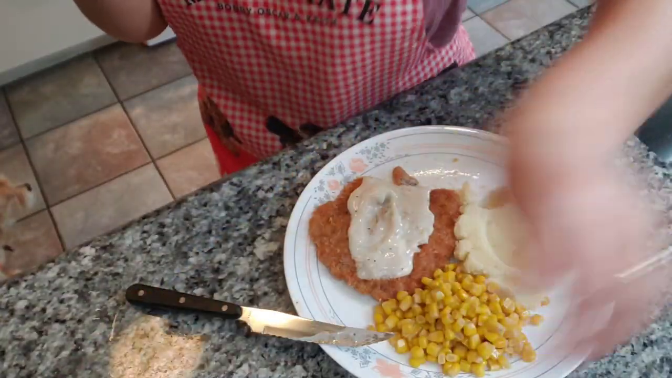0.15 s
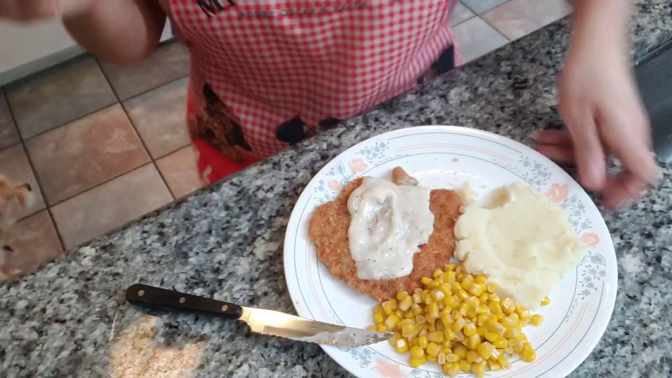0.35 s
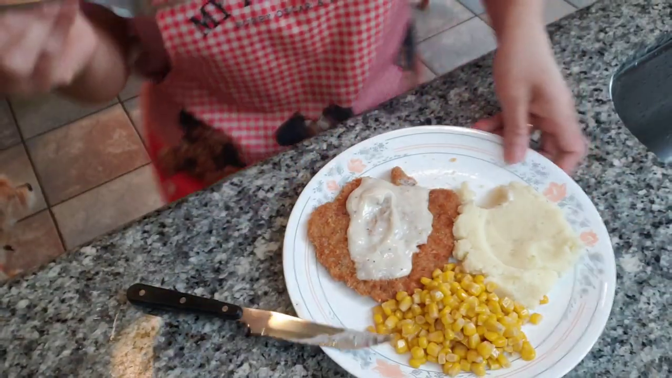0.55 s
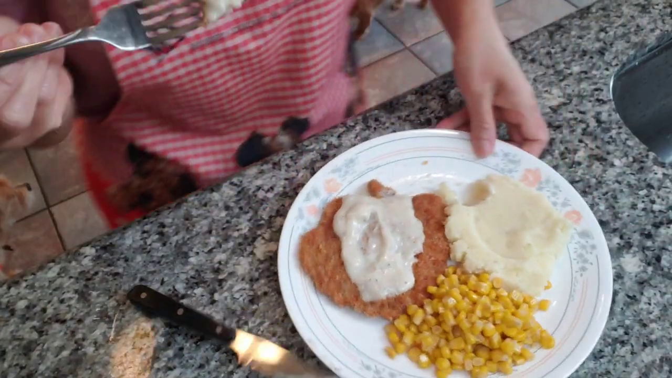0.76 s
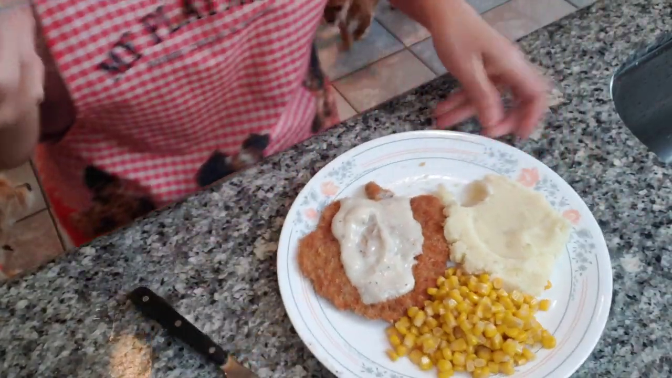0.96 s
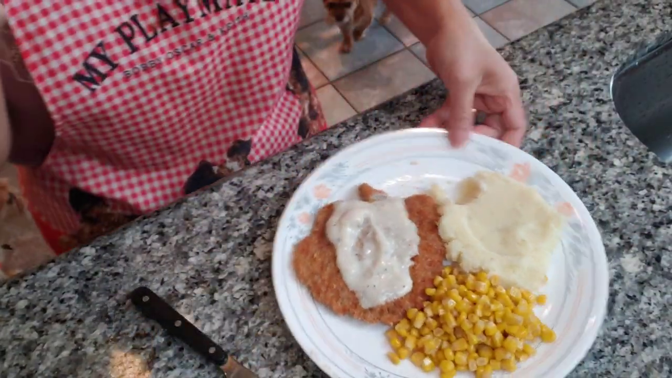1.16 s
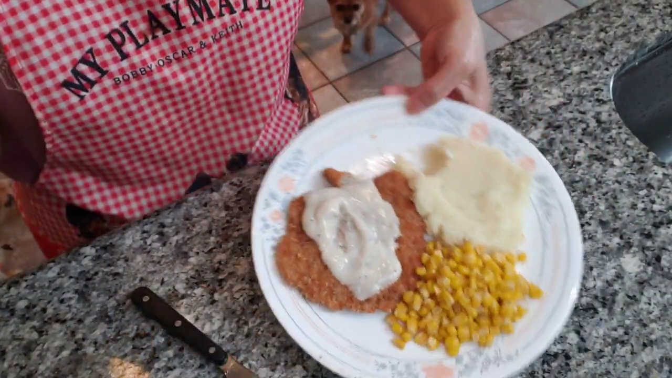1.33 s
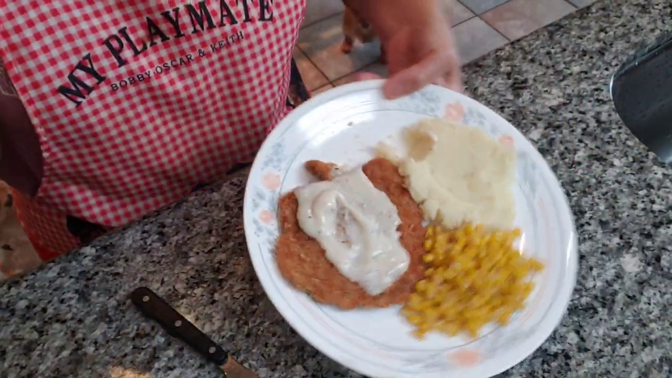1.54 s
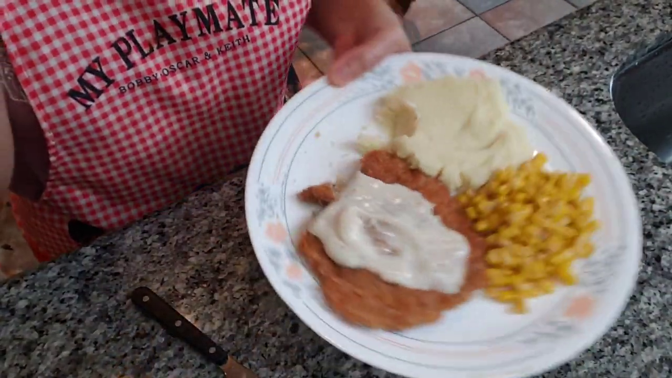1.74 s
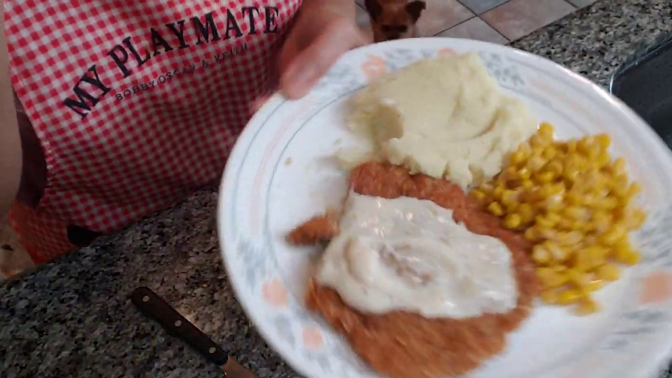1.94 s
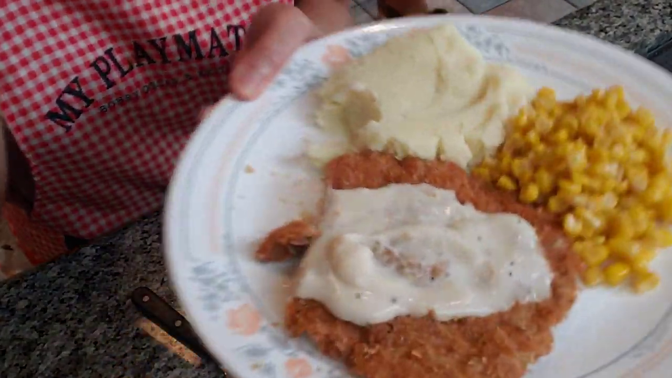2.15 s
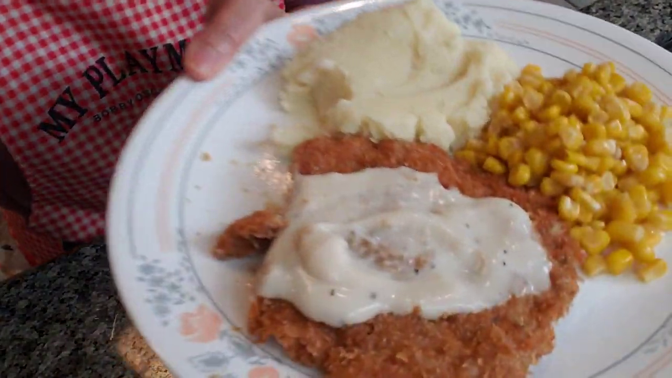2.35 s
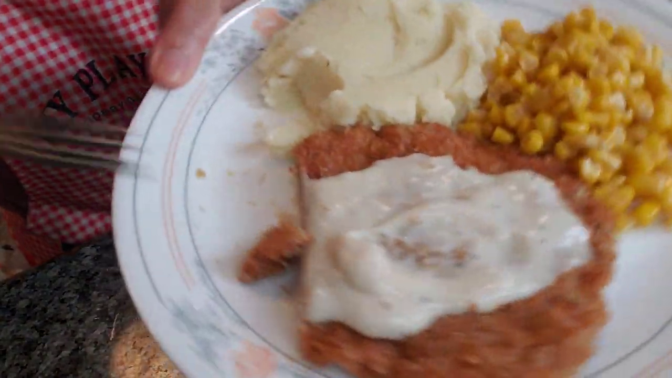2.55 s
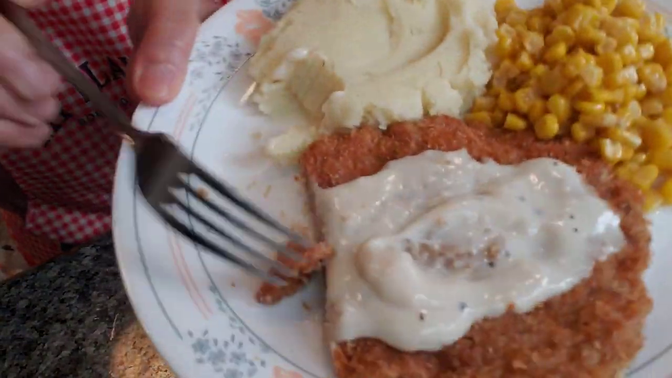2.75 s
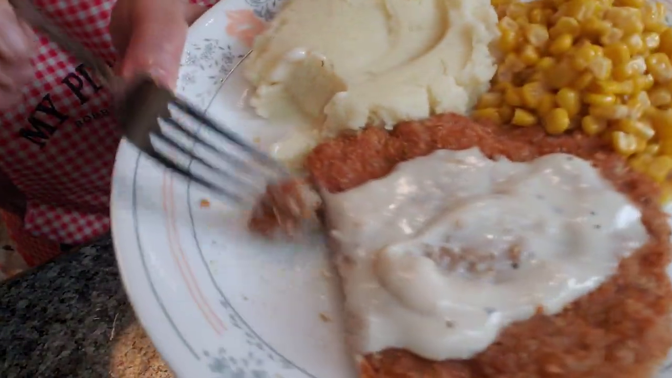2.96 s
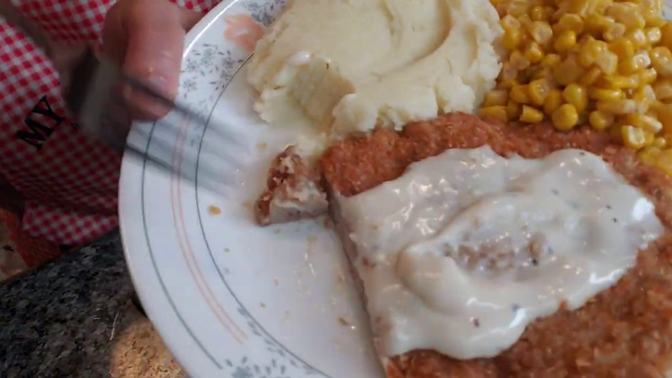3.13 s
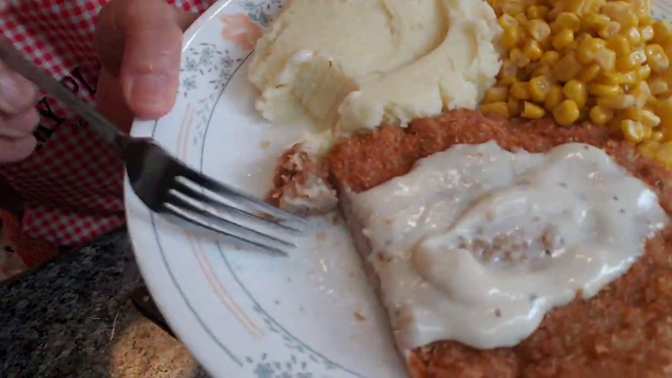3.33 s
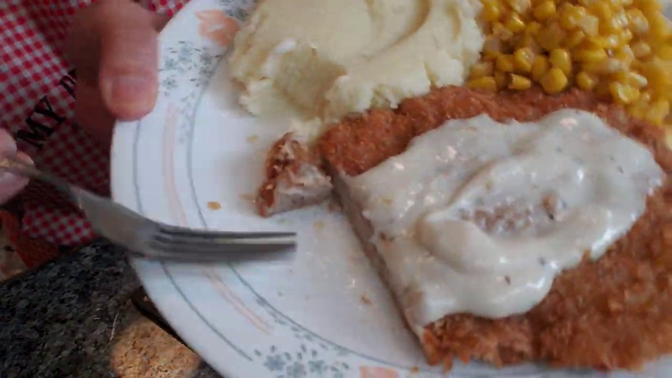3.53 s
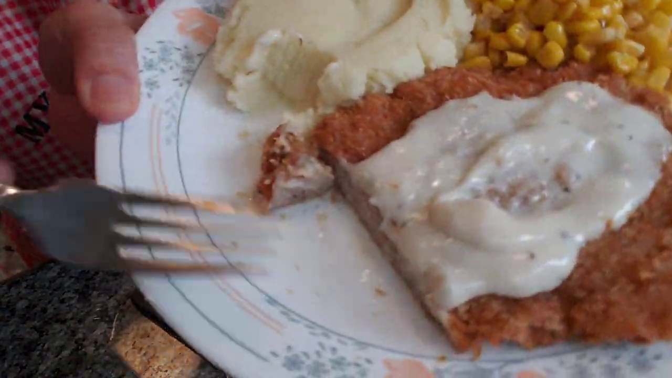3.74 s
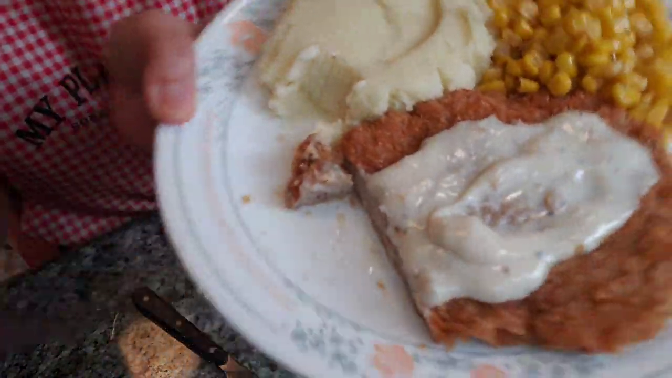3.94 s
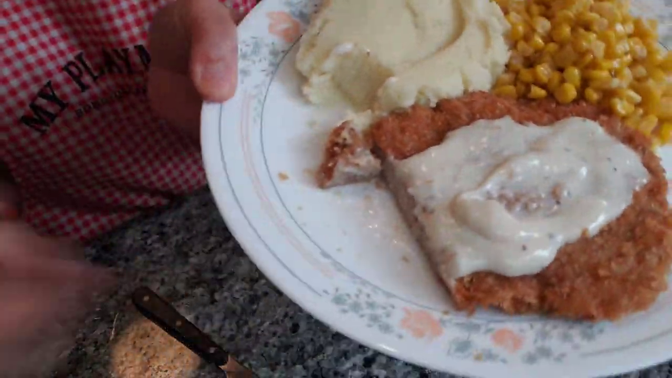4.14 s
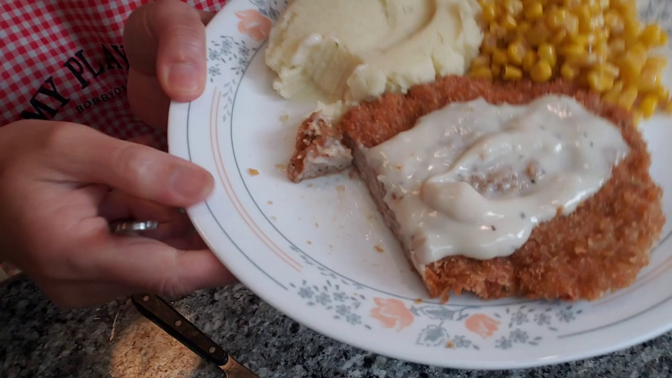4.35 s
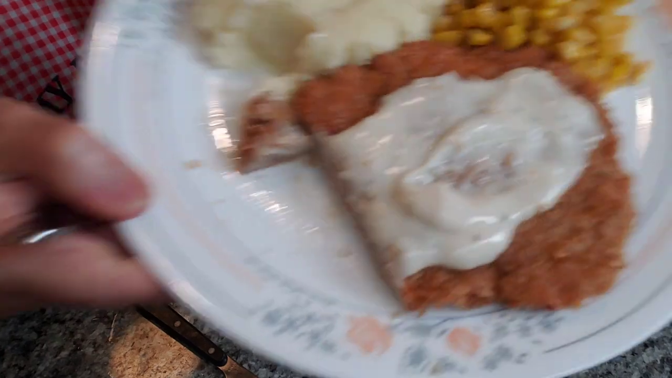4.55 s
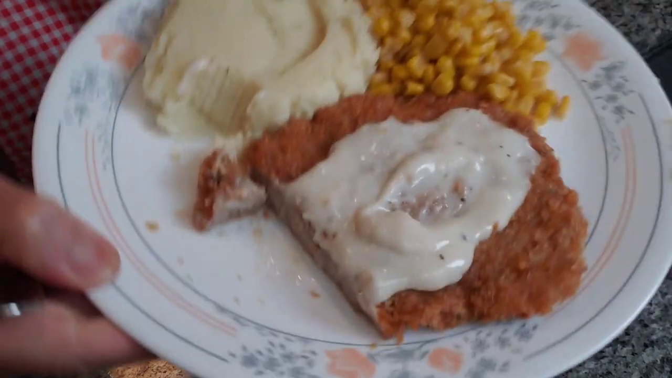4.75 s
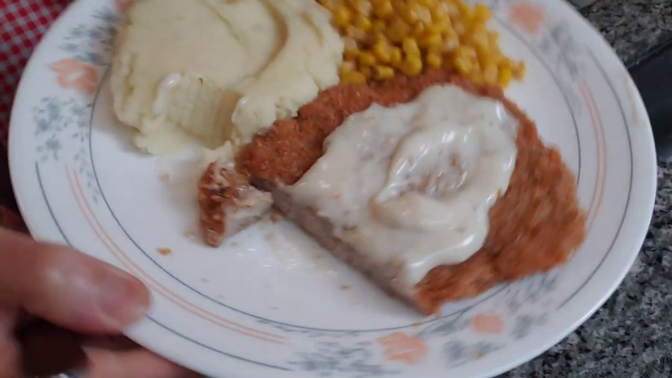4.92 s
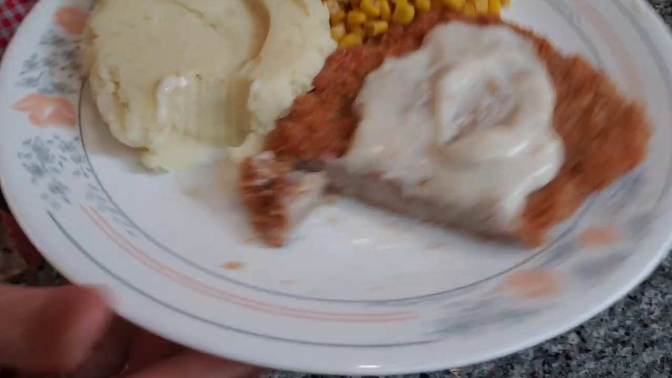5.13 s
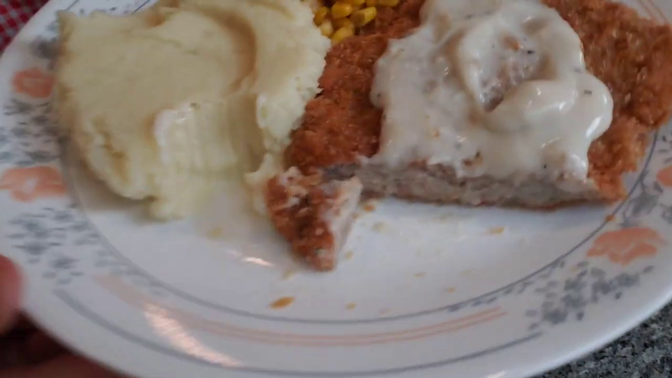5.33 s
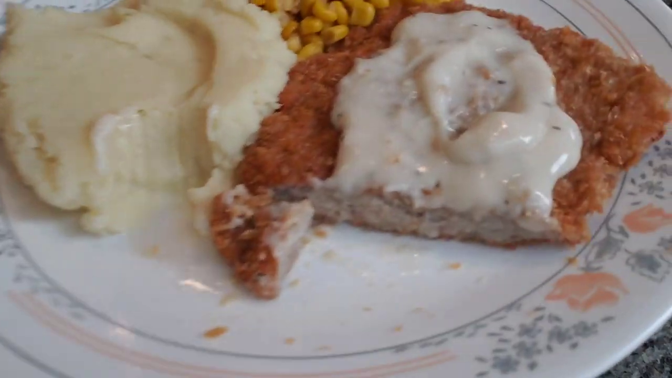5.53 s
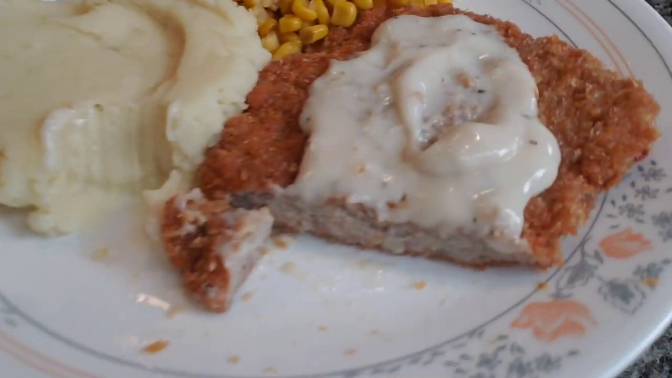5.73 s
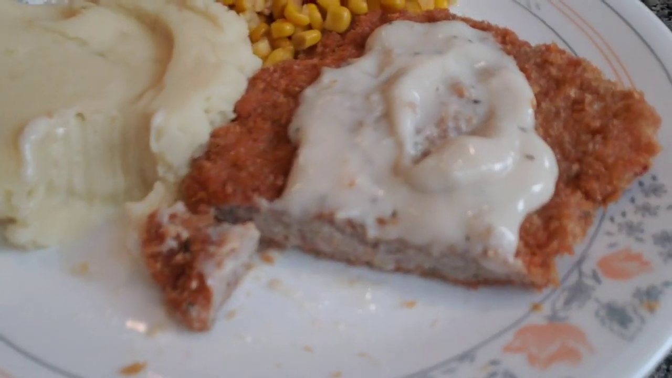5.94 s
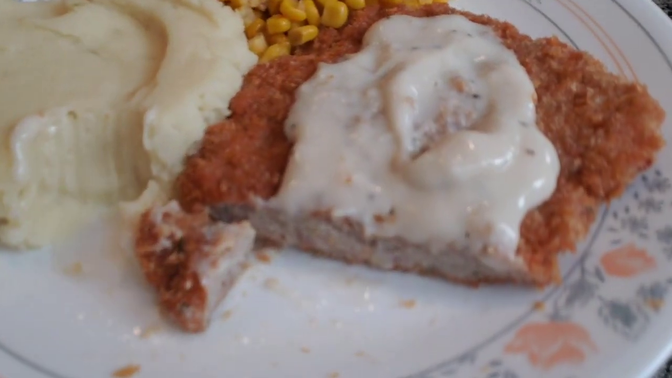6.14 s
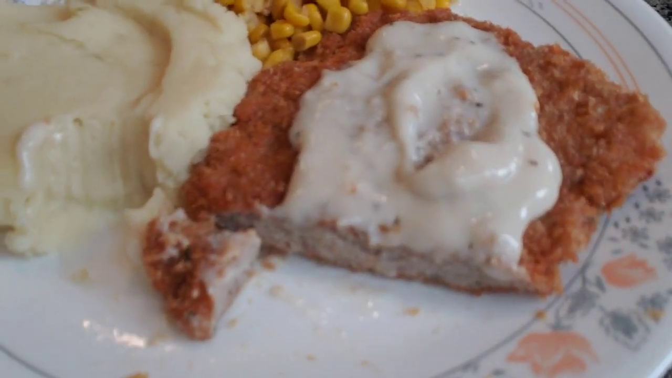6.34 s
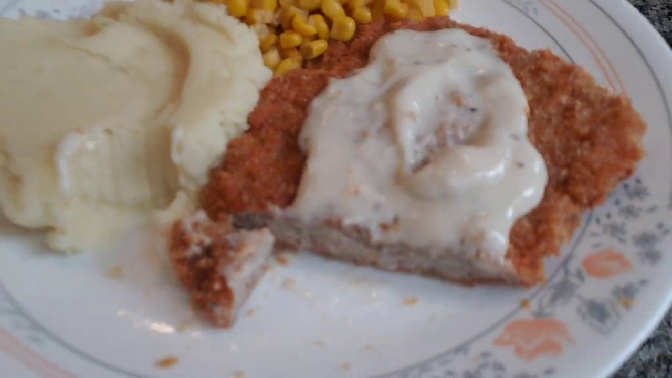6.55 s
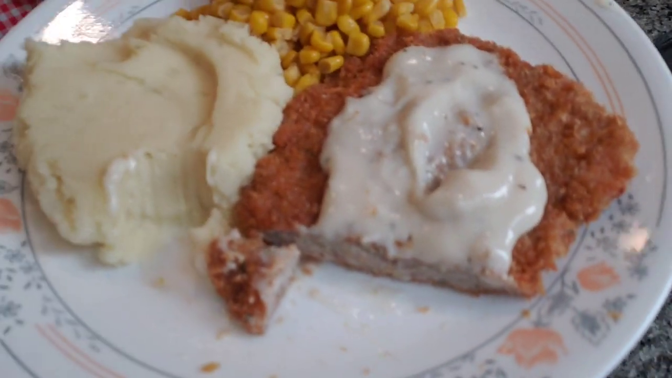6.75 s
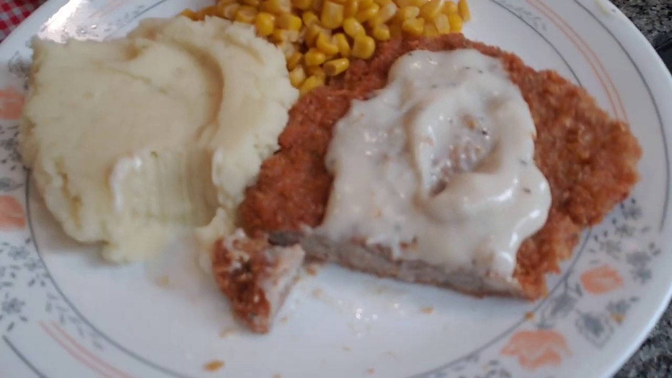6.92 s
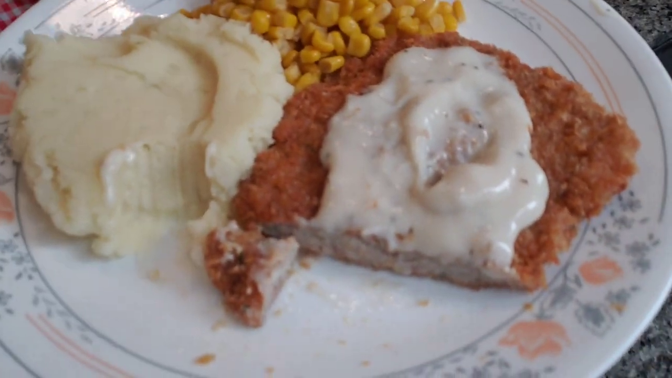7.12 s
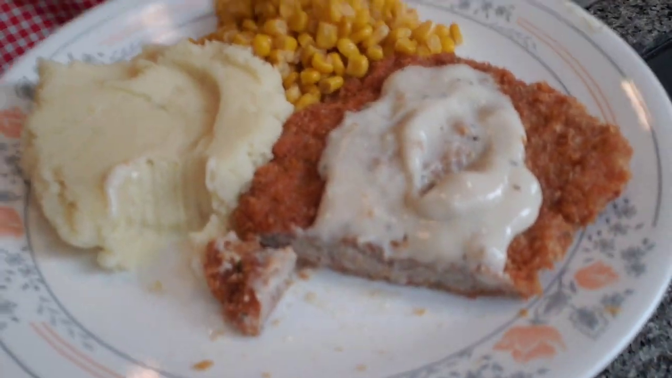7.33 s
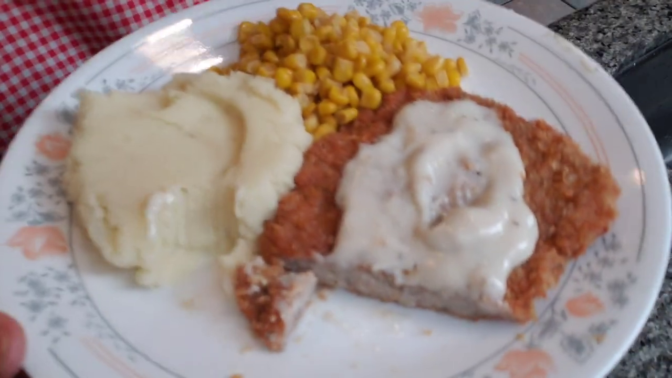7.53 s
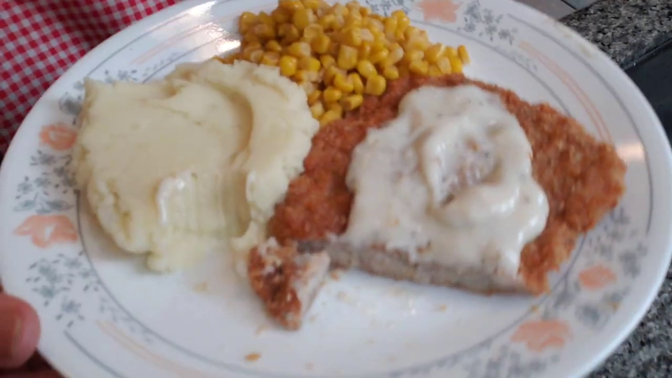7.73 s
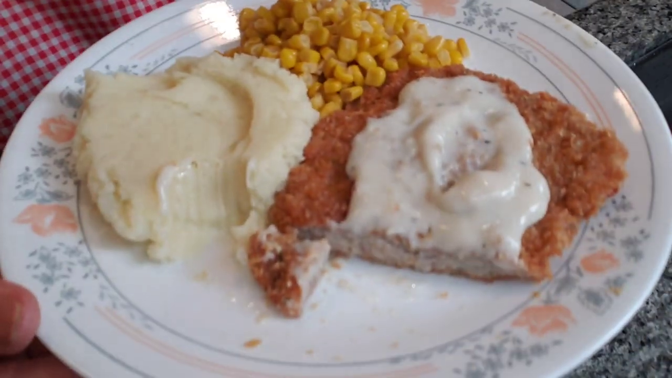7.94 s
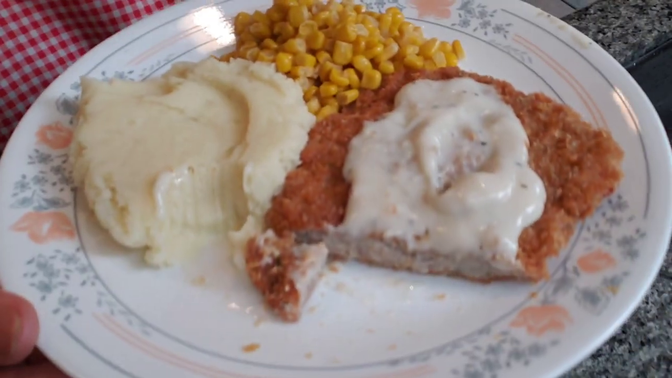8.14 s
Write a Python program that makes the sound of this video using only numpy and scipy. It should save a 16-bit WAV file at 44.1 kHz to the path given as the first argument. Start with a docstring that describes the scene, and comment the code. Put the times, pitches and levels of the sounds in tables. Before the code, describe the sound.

A faint appliance hum and room hiss fill a tiled kitchen, with a dog's claws ticking irregularly, soft paw shuffling and occasional low thuds. At about 1 second a ceramic plate is lifted from a stone counter and a knife slips off it: a quick cluster of dull knocks with one sharp, bright crack, the loudest moment. Softer knocks and scrapes follow from 1.9 to 2.5 seconds. Near 3 seconds a fork rubs the glaze and the plate sings faintly. From 3.5 to 4.1 seconds the fork taps the plate about four times, making close, bright, briefly ringing clinks with a little room echo. The whole background then sinks to near silence by 4.5 seconds, leaving only faint claw ticks. Hum and hiss return by about 7 seconds, with two light clicks at 7.3 and 7.7 seconds and soft thuds until the end, just past 8 seconds.

```python
"""A tiled kitchen: an appliance hums over room hiss; dog claws, stray knocks and low thuds come and go.
Near 1 s a plate is lifted off a stone counter and a knife slips off it: dull knocks with bright cracks.
Near 3 s a fork rubs the glaze and the plate sings; from 3.5 to 4 s it taps, ringing fork and plate.
The whole background then sinks, and is slowly back by about 7 s."""
import sys
import numpy as np
from scipy import signal
from scipy.fft import rfft, irfft
from scipy.io import wavfile

SR = 44100
rng = np.random.default_rng(int(sys.argv[2]) if len(sys.argv) > 2 else 0)


def pcm_store(signal):
    """Save signal as 16-bit PCM."""
    levels = np.round(np.clip(np.atleast_2d(signal), -1, 1) * 32767)
    wavfile.write(sys.argv[1], SR, levels.astype(np.int16).T)


N = 365144

# Hum level, which the background follows. Each row: time in seconds, level in dB.
HUM_LEVELS = [(0.0, -53), (3.43, -53.5), (3.83, -55), (4.47, -68), (5.26, -68), (6.02, -66.5), (6.59, -61),
              (7.24, -53), (8.28, -53.5)]
# Motor tones. Each row: frequency in Hz, relative level in dB, phase wander rate in Hz.
MOTOR_TONES = [(161, 1.5, 3.3), (504, -8.5, 3.8), (572, -10.5, 11), (799, -8, 2.9)]
# Room hiss. Each row: frequency in Hz, relative spectral density in dB.
HISS_SPECTRUM = [(60, -38), (100, -3.5), (162, -7.5), (250, -6.5), (320, -16.5), (450, -7.5), (858, -9),
                 (1350, -11), (2380, -8.5), (4360, -14), (7200, -16.5), (16000, -14)]
# Hiss width. Each row: frequency in Hz, left-right correlation.
HISS_CORRELATION = [(60, 1), (180, 0.36), (550, 0.67), (1650, -0.49), (4970, 0.15), (15000, -0.14)]
# Hiss balance. Each row: frequency in Hz, pan in dB (left over right, as in all tables).
HISS_PAN = [(60, -2), (240, 0), (950, 2.5), (3770, -3.5), (9000, 3), (15000, -4)]
# Thuds of steps and handling. Each row: peak time in seconds, level in dB.
THUD_PEAKS = [(0.41, -51), (0.71, -53), (1.04, -46), (1.73, -53), (1.96, -49), (2.3, -46), (2.55, -46),
              (2.76, -44), (3.34, -49), (3.71, -57), (4.49, -64), (5.09, -60), (5.63, -57), (6.76, -51),
              (7.52, -42.5), (8.04, -45), (8.28, -45)]
# Room decay. Each row: frequency in Hz, T60 in seconds.
ROOM_T60 = [(100, 0.1), (1000, 0.57), (4000, 0.58), (7000, 0.56), (10000, 0.47), (16000, 0.45)]
# Bouts of paw shuffling. Each row: peak time in seconds, level in dB.
SHUFFLE_PEAKS = [(0.05, -45.5), (0.35, -46.5), (1.53, -42.5), (2.02, -46.5), (2.36, -49), (2.53, -43),
                 (3.1, -44), (3.5, -43.5), (4.45, -56.5), (5.8, -55), (7.8, -43.5)]
# Claws on tile. Each row: start in seconds, peak in dB, resonance in Hz.
CLAW_TICKS = [(0.2117, -33.5, 2790), (0.235, -27.5, 1870), (0.3326, -36.5, 2350), (0.4202, -35, 2400),
              (0.529, -33.5, 3820), (0.6946, -30, 2980), (0.944, -32, 2380), (1.2182, -36, 2300),
              (1.3126, -30, 2700), (1.6452, -38.5, 2750), (2.321, -30, 3120), (2.649, -35, 2760),
              (2.809, -32.5, 3200), (3.016, -34.5, 2720), (3.263, -31.5, 2520), (3.3358, -35.5, 1300),
              (3.767, -33, 1510), (4.415, -50, 2200), (4.5, -48.5, 2130), (4.73, -51, 3100),
              (4.91, -48, 1620), (5.0146, -46.5, 2450), (5.3228, -39.5, 2560), (5.546, -47, 2280),
              (5.7348, -41.5, 2370), (5.8153, -41.5, 1430), (6.0686, -43, 1450), (6.123, -42.5, 2480),
              (6.22, -46, 3980), (6.4022, -49, 1800), (6.618, -40, 2190), (6.7024, -39.5, 1740),
              (6.825, -36, 1950), (6.868, -36.5, 3500), (6.9875, -37, 2430), (7.099, -38.5, 2340),
              (7.1652, -36.5, 1270), (7.278, -35, 3750), (7.325, -34, 4630), (7.328, -37, 1480),
              (7.384, -39, 2630), (7.4773, -35.5, 2000), (7.741, -34.5, 5280), (7.773, -31, 2330),
              (7.7958, -33, 1600), (8.059, -30.5, 2040), (8.1893, -34.5, 2600)]
# Assorted knocks, ticks, scrapes and low thuds, including knife and plate on the counter near 1 s.
# Each row: start in seconds, peak in dB, body in Hz, crack over body in dB,
# contact time in seconds, pan in dB.
KNOCKS_AND_TICKS = [(0.21, -31, 2700, -15, 0.0016, 0), (1.021, -11.5, 720, 1.5, 0.011, 2),
                    (1.023, -9, 1120, 12, 0.00087, 14), (1.076, -18, 710, -1, 0.021, 3),
                    (1.093, 4, 5600, 16, 0.00054, -5), (1.096, -24.5, 3800, 5, 0.015, 10),
                    (1.099, -15, 796, 1.5, 0.0026, 13.5), (1.1026, -20, 6040, 0, 0.0017, 19),
                    (1.096, -32, 340, -18, 0.044, -2), (1.084, -33, 121, -30, 0.044, -1),
                    (1.138, -31, 392, -10, 0.008, 1), (1.14, -29, 6000, -7, 0.0026, 7),
                    (1.502, -29.5, 400, -3.5, 0.012, 6), (1.9, -18, 470, -20, 0.031, 3),
                    (1.892, -27, 2530, -8.5, 0.061, 16), (1.897, -18.5, 6500, -13, 0.022, -2),
                    (1.952, -26.5, 493, -13, 0.051, 2), (2.012, -33.5, 503, -17, 0.049, 4),
                    (2.381, -28.5, 197, -24, 0.064, 2), (2.381, -29.5, 900, -14, 0.042, 6),
                    (2.436, -29.5, 1490, -25, 0.046, 6), (2.537, -32.5, 236, -15, 0.058, 6),
                    (3.015, -28.5, 5500, -1, 0.024, 1), (3.462, -31, 5000, -5, 0.02, 7),
                    (3.485, -26.5, 394, -13, 0.018, 5), (4.036, -42.5, 62, -40, 0.017, 19),
                    (4.677, -35, 6000, 7, 0.002, 6), (7.332, -21.5, 4800, 5, 0.008, 2),
                    (7.74, -22, 6150, -5, 0.0033, 2)]
# Tines on glaze. Each row: start in seconds, peak in dB, mode in Hz, contact time in seconds.
FORK_RUBS = [(3.025, -40.5, 1214, 0.069), (3.127, -34.5, 1230, 0.0095), (3.114, -31, 715, 0.037),
             (3.2, -35, 541, 0.042), (3.201, -34, 715, 0.048), (3.254, -38, 740, 0.025)]
# Plate modes. Each row: frequency in Hz, gain in dB, T60 in seconds.
PLATE_MODES = [(351, 0.5, 0.15), (482, 8.5, 0.078), (757, 10.5, 0.053), (1364, 11, 0.08), (2000, 6, 0.084),
               (2700, -6, 0.057)]
# Fork modes. Each row: frequency in Hz, gain in dB, T60 in seconds before hand damping.
FORK_MODES = [(3600, 14, 0.055), (3980, 23.5, 0.06), (4780, 11, 0.12), (5740, 8, 0.1), (6780, -9, .1),
              (6860, 7, 0.15), (7100, 3, 0.089), (7080, 8, .1), (7480, 8, 0.1), (7960, 11, 0.05),
              (8900, 15, .08), (9370, 15, 0.1), (10400, 14, 0.13), (11450, 12.5, 0.12), (12320, 5.5, 0.08),
              (13060, 4, 0.054), (14180, 7, .06), (14590, 9, 0.065), (15400, 9, .06)]
# Fork on plate. Each row: start in seconds, peak in dB, lower and upper favoured pitch in Hz,
# upper trim in dB, shunned pitch in Hz, rise and contact time in seconds,
# plate over fork in dB, pan in dB.
FORK_TAPS = [(3.491, -5, 5000, 15100, 0, 9000, 0.0044, 0.002, -16.5, 6),
             (3.501, -16, 4200, 15000, -11, 8800, 0.0047, 0.011, -15, 4),
             (3.623, -8.5, 6000, 10500, -10.5, 8700, 0.00093, 0.022, -13, 3.5),
             (3.818, -9.5, 5500, 12700, 13, 8900, 0.0034, 0.0059, -29, 3),
             (3.825, -10, 5260, 12100, -2.5, 8150, 0.0044, 0.016, -18.5, 0.5),
             (4.036, -6, 7340, 13100, 16, 4320, 0.0022, 0.017, -21, 3.5),
             (4.051, -7, 7500, 12400, -7.5, 4150, 0.0092, 0.023, -28, -2)]
# Microphone response. Each row: frequency in Hz, left gain in dB, right gain in dB.
MIC_RESPONSE = [(900, -2, -2.5), (7260, 5, -2.5), (8330, -7, -3), (10000, -4, -3), (11760, -1, -2.5),
                (14500, 2, -4)]
# Phase turns on the right side. Each row: centre in Hz, width in Hz.
MIC_PHASE_TURNS = [(1700, 150), (3300, 1000), (5000, 2300), (7700, 310), (9300, 230), (12000, 880),
                   (14500, 360)]

HISS_OVER_HUM_DB, RUMBLE_OVER_HUM_DB, SHUFFLE_OVER_HUM_DB = 13, -6.5, -13
ANTIPHASE = np.array([[1], [-1]])


def amp(db):
    return 10 ** (np.asarray(db) / 20)


def unit_rms(x):
    return x / np.sqrt(np.mean(x ** 2) + 1e-20)


def at_hz(points, hz):
    points_hz, values = np.transpose(points)
    return np.interp(np.log(np.maximum(hz, 1)), np.log(points_hz), values)


def pan(db):
    return amp(ANTIPHASE * db / 2)


def bandpass(x, edges_hz, order):
    return signal.sosfilt(signal.butter(order, edges_hz, "band", fs=SR, output="sos"), x)


def band(x, hz, octaves, passes=1):
    edges_hz = np.clip(hz * 2.0 ** (np.array([-.5, .5]) * octaves), 20, .45 * SR)
    for _ in range(passes):
        x = bandpass(x, edges_hz, order=1)
    return x


def bell_curve(hz, centre_hz, octaves):
    return np.exp(-(np.log2(hz / centre_hz) / octaves) ** 2)


def drift(rate_hz):
    """Slow random wander, unit RMS."""
    hop = 40
    r = np.exp(-2 * np.pi * rate_hz * hop / SR)
    slow = signal.lfilter([1], [1, -2 * r, r * r], rng.standard_normal(N // hop + 2002))[2000:]
    return np.interp(np.arange(N) / hop, np.arange(len(slow)), unit_rms(slow))


def ring(x, hz, t60_s):
    """One decaying mode."""
    r, w = amp(-60 / (t60_s * SR)), 2 * np.pi * hz / SR
    return signal.lfilter([0, np.sin(w)], [1, -2 * r * np.cos(w), r * r], x + 1e-18)


def burst(decay_s, size, rise_s=1e-4):
    """Rough contact: noise with a linear rise and exponential decay."""
    t = np.arange(size) / SR
    attack = np.minimum(t / max(rise_s, 1e-4), 1)
    return rng.standard_normal(size) * attack * np.exp(-np.maximum(t - rise_s, 0) / decay_s)


def click(at_s, size):
    return np.arange(size) == round(at_s * SR)


def swells(peaks, floor_db, rise_db_per_s, fall_db_per_s):
    """Gain that climbs from a floor to each peak and falls back."""
    t = np.arange(N) / SR
    level_db = floor_db
    for peak_s, peak_db in peaks:
        slope = np.where(t < peak_s, rise_db_per_s, fall_db_per_s)
        level_db = np.maximum(level_db, peak_db - slope * np.abs(t - peak_s))
    return amp(level_db)


def add(track, start_s, sound, peak_db, pan_db):
    at = round(start_s * SR)
    placed = pan(pan_db) * amp(peak_db) * sound / np.abs(sound).max()
    track[:, at:at + sound.shape[-1]] += placed[:, :N - at]


def room_hiss():
    """Third-octave noise bands, each with its own level, flicker, width and pan."""
    out, edges_hz = 0, 80 * 2 ** np.arange(0, 8, 1 / 3)
    white = rng.standard_normal((2, 2, N))
    for k, (low_hz, high_hz) in enumerate(zip(edges_hz, edges_hz[1:])):
        mid, side = bandpass(white[k % 2], [low_hz, high_hz], order=2)
        hz = np.sqrt(low_hz * high_hz)
        correlation = at_hz(HISS_CORRELATION, hz)
        gain = amp(at_hz(HISS_SPECTRUM, hz) + 2.92 * drift(16.1)) * pan(at_hz(HISS_PAN, hz))
        out += gain * (np.sqrt(1 + correlation) * mid + np.sqrt(1 - correlation) * side * ANTIPHASE)
    return unit_rms(out)


def appliance_hum(waver_db=1.2):
    """Motor tones: sines wandering slightly in phase and level."""
    t = np.arange(N) / SR
    tones = 0
    for hz, db, wander_hz in MOTOR_TONES:
        phase = 2 * np.pi * hz * t + 0.48 * drift(wander_hz)
        tones += amp(db + waver_db * drift(6)) * np.sqrt(2) * np.sin(phase)
    return tones * pan(0.61)


def thuds(hum_db):
    """Near-mono rumble with a floor resonance, swelling at each thud."""
    mid, side = bandpass(rng.standard_normal((2, N)), [36, 100], order=2)
    mid = unit_rms(mid) + 0.86 * unit_rms(ring(mid, hz=67.3, t60_s=1.0))
    rumble = unit_rms(mid + .3 * unit_rms(side) * ANTIPHASE) * pan(2)
    floor_db = hum_db + RUMBLE_OVER_HUM_DB + 2.2 * drift(1.2)
    return rumble * swells(THUD_PEAKS, floor_db, rise_db_per_s=108, fall_db_per_s=61)


def kitchen_reverb(x, spots=4, dwell_s=.19):
    """Dense reflections in half-octave bands; the moving microphone cycles through sets of them."""
    t = np.arange(SR * 3 // 4) / SR
    white = rng.standard_normal((spots, 2, len(t))) * np.minimum(t / 0.0013, 1)
    tails = sum(band(white, hz, octaves=.5, passes=2) * amp(-60 * t / at_hz(ROOM_T60, hz))
                for hz in 125 * 2 ** np.arange(0, 7.1, .5))
    position = np.arange(N) / SR / dwell_s
    out = 0
    for k, tail in enumerate(tails):
        distance = np.abs((position - k + spots / 2) % spots - spots / 2)
        crossfade = np.sqrt(np.maximum(1 - distance, 0))
        response = tail / np.sqrt(np.sum(tail ** 2) / 2)
        out += signal.fftconvolve([x.mean(axis=0) * crossfade], response)[:, :N]
    return out


def paw_shuffle(hum_db):
    """Soft shuffling: fluttering noise that swells in bouts."""
    noise = band(rng.standard_normal((2, N)), 2300, octaves=1.6, passes=2)
    patter = unit_rms(noise * amp(2.5 * drift(14)))
    bouts = swells(SHUFFLE_PEAKS, hum_db + SHUFFLE_OVER_HUM_DB, rise_db_per_s=97, fall_db_per_s=114)
    return bouts * patter * pan(0.57)


def claws():
    """Each claw lands with a tick and skids briefly, with a broad resonance."""
    out, size = np.zeros((2, N)), SR // 5
    for start_s, peak_db, hz in CLAW_TICKS:
        skid = burst(decay_s=.038, size=size, rise_s=.004)
        tone = unit_rms(band(skid, hz, octaves=.8, passes=2))
        scratch = unit_rms(band(skid, 5000, octaves=2.4))
        touch = burst(decay_s=0.0032, size=size)
        tick = unit_rms(band(touch, 2300, octaves=1.4)) + 1.33 * unit_rms(ring(touch, hz, t60_s=0.017))
        add(out, start_s, tone + 0.35 * scratch + 0.5 * unit_rms(tick), peak_db, pan_db=4.5)
    return out


def knocks_and_ticks(sharp_s=0.0018):
    """Unringing contacts: broad body, bright crack. Returns direct sound and room send."""
    direct, send = np.zeros((2, 2, N))
    size = SR // 4
    for start_s, peak_db, hz, crack_db, contact_s, pan_db in KNOCKS_AND_TICKS:
        blow = burst(contact_s, size, rise_s=0.15 * contact_s)
        body = band(band(blow, hz, octaves=0.86), hz, octaves=5.5)
        snap = burst(2 * contact_s, size, rise_s=0.14 * contact_s) + 9 * click(0.095 * contact_s, size)
        crack = band(snap, 10900, octaves=0.84)
        knock = unit_rms(body) + amp(crack_db) * unit_rms(crack)
        send_db = 20 * np.log10(contact_s / (contact_s + sharp_s))   # sharp knocks arrive mostly direct
        add(direct, start_s, knock, peak_db, pan_db)
        add(send, start_s, knock, peak_db + send_db, pan_db)
    return direct, send


def fork_rubs():
    """Tines dragged over the glaze make one low mode sing."""
    out = np.zeros((2, N))
    for start_s, peak_db, hz, contact_s in FORK_RUBS:
        drag = burst(contact_s, SR // 2, rise_s=0.0055)
        add(out, start_s, ring(drag, hz, t60_s=0.13), peak_db, pan_db=3.5)
    return out


def fork_ring(drive, low_hz, high_hz, high_db, shunned_hz, hand_t60_s=.022):
    """Hand-damped fork modes; the struck spot favours two pitches and shuns one."""
    detunes = rng.normal(1, 0.006, len(FORK_MODES))
    scatter_db = rng.normal(0, 2.5, len(FORK_MODES))
    out = 0
    for (hz, db, t60_s), detune, random_db in zip(FORK_MODES, detunes, scatter_db):
        spot_db = (5.3 * bell_curve(hz, low_hz, octaves=0.18)
                   + (18 + high_db) * bell_curve(hz, high_hz, octaves=0.31)
                   - 11 * bell_curve(hz, shunned_hz, octaves=0.12))
        held_t60_s = 1 / (1 / t60_s + 1 / hand_t60_s)
        out += amp(db + random_db + spot_db) * ring(drive, hz * detune, held_t60_s)
    return unit_rms(out)


def fork_taps():
    """Tines click and chatter, ringing fork and plate. Returns direct sound and room send."""
    direct, send = np.zeros((2, 2, N))
    size = SR // 4
    for (start_s, peak_db, low_hz, high_hz, high_db, shunned_hz,
         rise_s, contact_s, plate_db, pan_db) in FORK_TAPS:
        blow = burst(contact_s, size, rise_s) + 3.6 * click(rise_s, size)
        side = 0.61 * burst(contact_s, size, rise_s) * ANTIPHASE
        bright = band(blow + side, 8000, octaves=3.5, passes=2)
        dull = band(blow, 1100, octaves=3.5)
        fork = fork_ring(bright, low_hz, high_hz, high_db, shunned_hz)
        plate = sum(amp(db) * ring(dull, hz, t60_s) for hz, db, t60_s in PLATE_MODES)
        ringing = fork + amp(plate_db) * unit_rms(plate)
        low = unit_rms(band(bright, low_hz, octaves=1.0))
        high = unit_rms(band(bright, high_hz, octaves=0.5))
        chatter = 0.82 * unit_rms(low + amp(high_db) * high)
        add(direct, start_s, ringing + chatter, peak_db, pan_db)
        add(send, start_s, .45 * ringing + chatter, peak_db, pan_db)
    return direct, send


def scene():
    """Direct sources, room reflections and background."""
    hum_db = np.interp(np.arange(N) / SR, *np.transpose(HUM_LEVELS))
    taps, tap_send = fork_taps()
    rubs = fork_rubs()
    knocks, knock_send = knocks_and_ticks()
    dog = claws() + paw_shuffle(hum_db)
    background = amp(hum_db) * (appliance_hum() + amp(HISS_OVER_HUM_DB) * room_hiss()) + thuds(hum_db)
    room = kitchen_reverb(amp(-4.5) * tap_send + amp(-1) * knock_send + amp(-2) * dog) * pan(0.36)
    return background + room + dog + knocks + rubs + taps


def record(dry):
    """Microphone: colour per side, phase turned on the right by the housing, soft clip, low-pass."""
    ceiling, cutoff_hz = .9, 15780
    hz = np.arange(N // 2 + 1) * SR / N
    colour_db = [at_hz(np.array(MIC_RESPONSE)[:, [0, column]], hz) for column in (1, 2)]
    left, right = irfft(rfft(dry) * amp(colour_db), N)
    for centre_hz, width_hz in MIC_PHASE_TURNS:
        r = np.exp(-np.pi * width_hz / SR)
        poles = [1, -2 * r * np.cos(2 * np.pi * centre_hz / SR), r * r]
        right = signal.lfilter(poles[::-1], poles, right)   # all-pass
    rounded = ceiling * np.tanh(np.array([left, right]) / ceiling)
    return signal.sosfilt(signal.ellip(10, .2, 60, cutoff_hz, fs=SR, output="sos"), rounded)


dry = scene()
out = record(dry)
pcm_store(out)
```